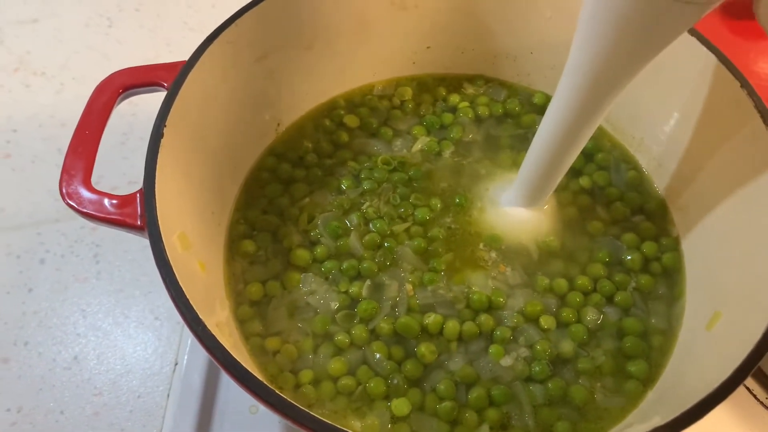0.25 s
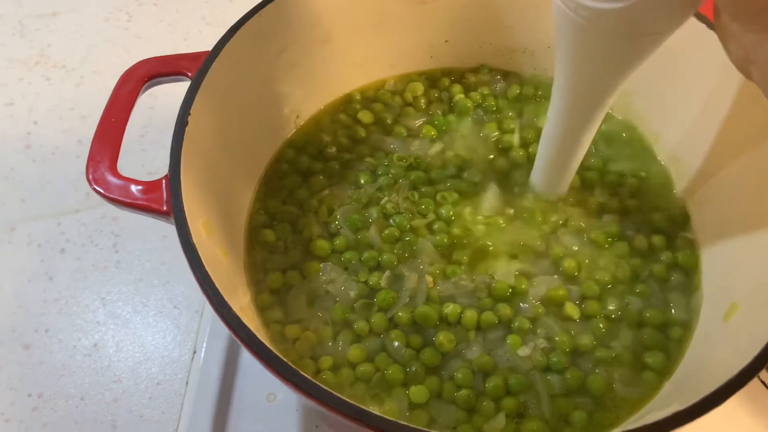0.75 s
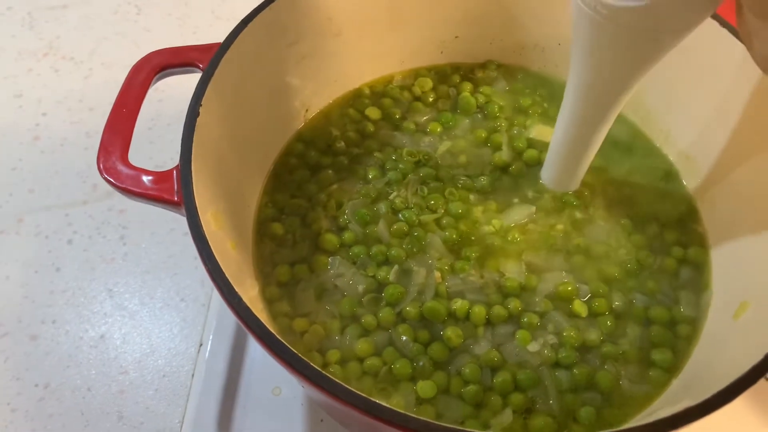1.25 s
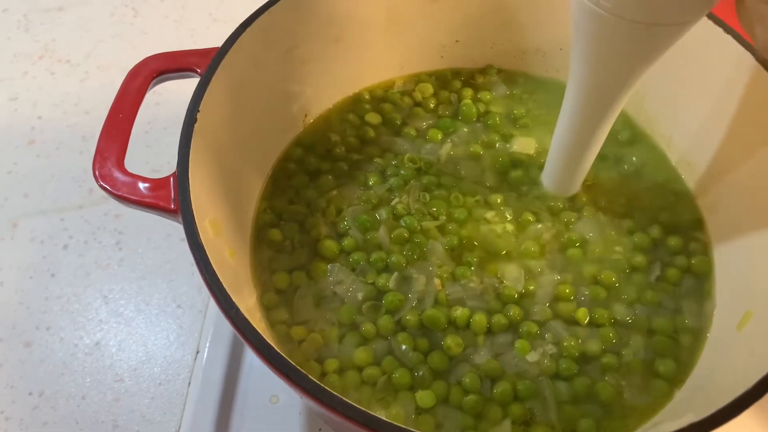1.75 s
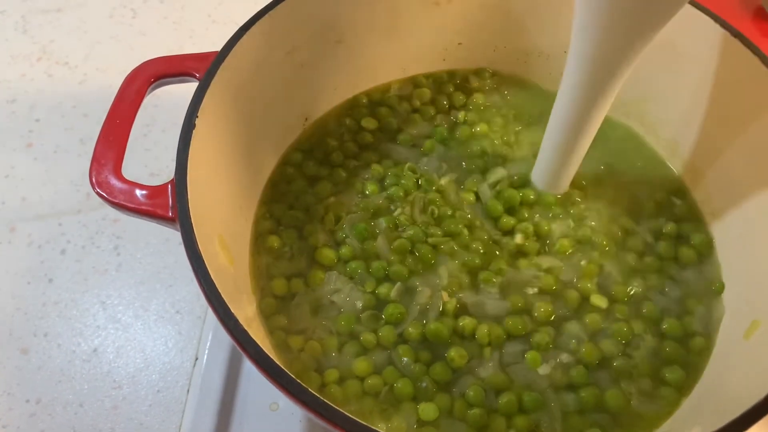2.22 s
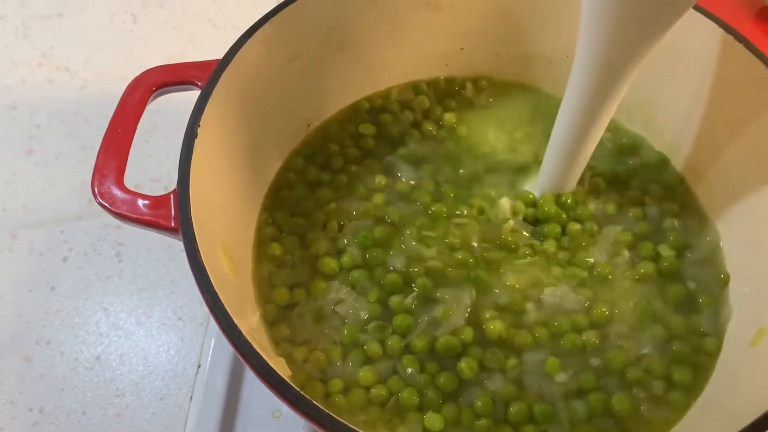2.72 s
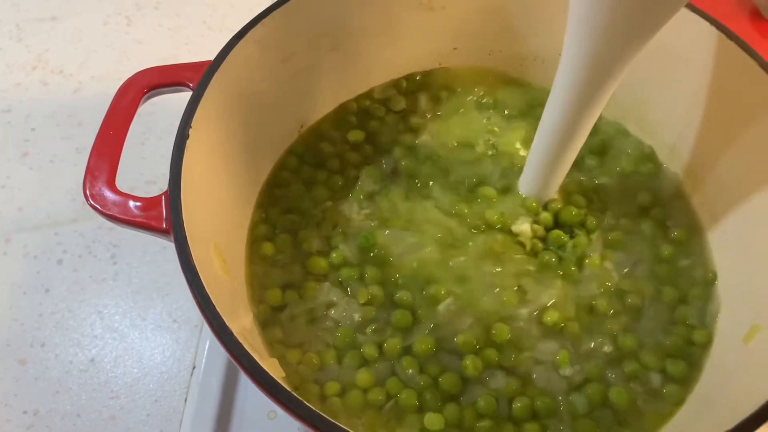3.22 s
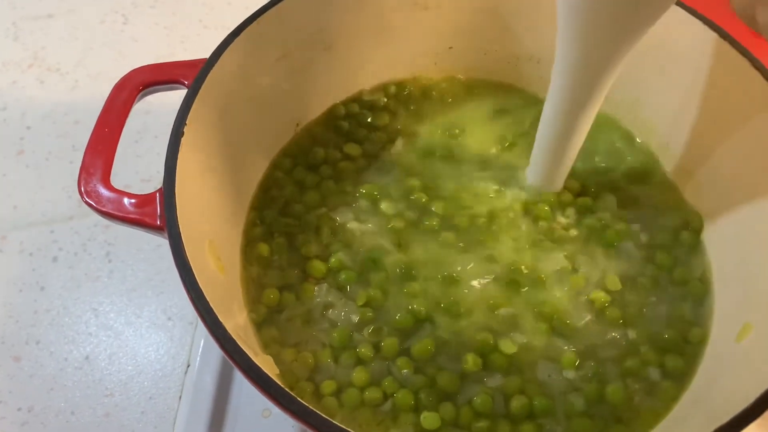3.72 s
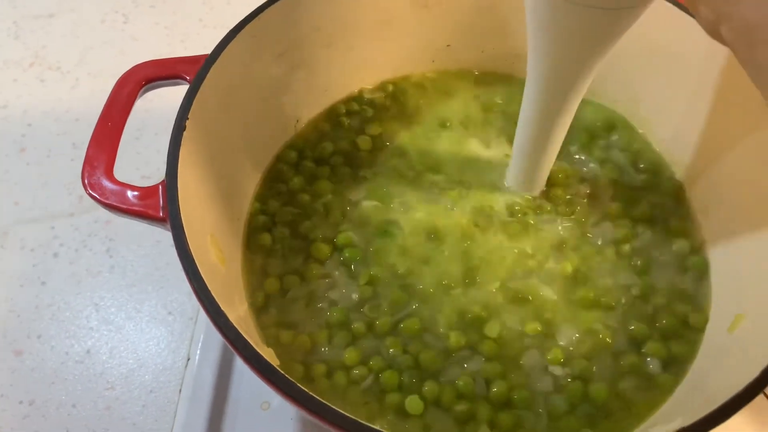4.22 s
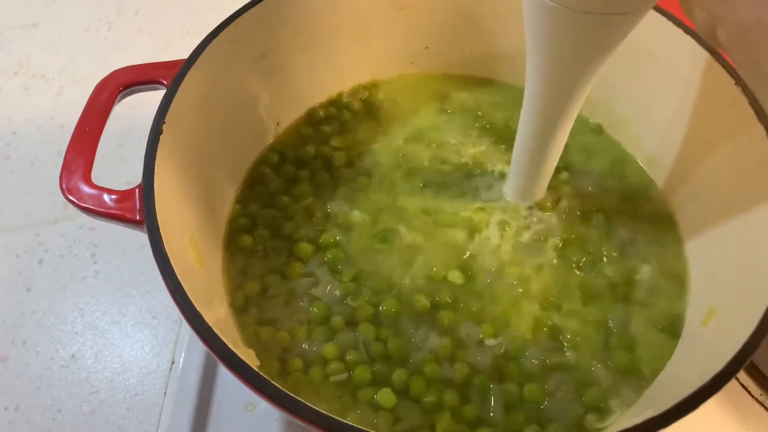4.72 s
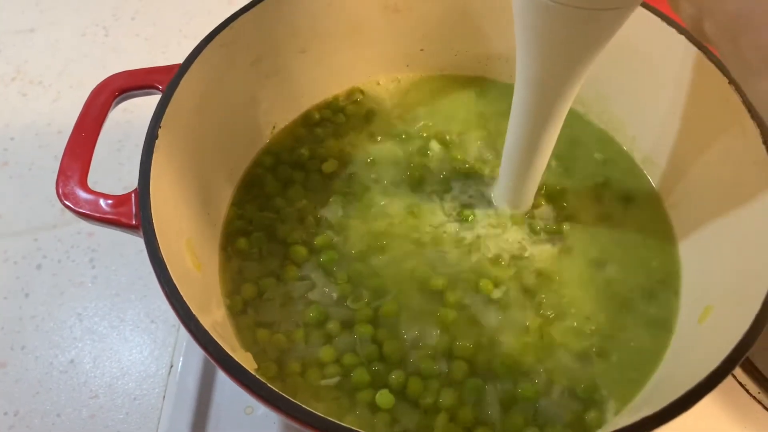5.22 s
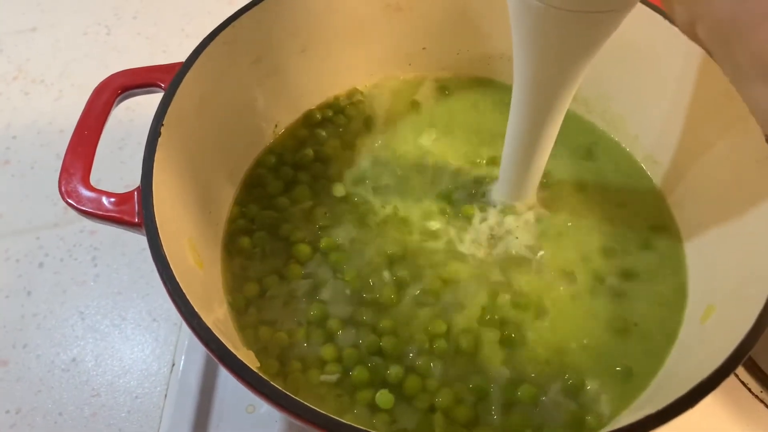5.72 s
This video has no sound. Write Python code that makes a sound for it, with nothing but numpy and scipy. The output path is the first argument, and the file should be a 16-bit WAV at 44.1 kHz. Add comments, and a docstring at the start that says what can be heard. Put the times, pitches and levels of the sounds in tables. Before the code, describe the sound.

A hand-held blender purees peas in a pot in three bursts, its whine starting, coasting down and restarting amid wet splashing and clicks.

```python
"""Faint room noise, then a switch click: a hand-held blender starts to puree pea soup in an enamelled pot.
It runs in three bursts, close to a phone in a small kitchen, with switch clicks around each start.
The motor spins up, labours and coasts down; its two-winged blade sings at even multiples of the shaft speed.
Shaped noise makes the soup swirl, splash and spray, and makes the fizz of bubbles collapsing behind the blade.
Short ringing tones make glugs and stirred bubbles; brief noise bursts make pops and the knocks of peas."""
import sys
import numpy as np
from scipy import signal
from scipy.fft import rfft, irfft, next_fast_len
from scipy.io import wavfile
from scipy.ndimage import map_coordinates

SR = 44100
rng = np.random.default_rng(int(sys.argv[2]) if len(sys.argv) > 2 else 0)


def generate_wav(sig):
    """Save sig (samples, or channels by samples) to the path in sys.argv[1] as 16-bit PCM at SR."""
    pcm = np.round(np.clip(np.atleast_2d(sig).T, -1, 1) * 32767).astype(np.int16)
    wavfile.write(sys.argv[1], SR, pcm)


N = 263012  # length [samples]

# Level columns are relative: the functions may trim or fade them further.
# background noise of the room: (time [s], level [dB])
BACKGROUND = [(0.11, -53), (0.6, -62.5)]
# its tone colour: (frequency [Hz], level [dB])
BACKGROUND_SPECTRUM = [(20, -33), (50, 6.5), (100, -8.5), (160, 0.5), (280, -0.5), (500, -11.5),
                       (1200, -20), (2300, -9), (4000, -24), (16000, -48.5)]

# switch contacts: (time [s], level [dB])
SWITCH = [(0.1247, -28), (0.128, -10.5), (1.178, -47.5), (1.206, -43), (1.216, -20.5), (3.2, -42),
          (3.218, -41)]
# plastic housing that they ring: (frequency [Hz], level [dB], time to fall 60 dB [s])
HOUSING = [(950, -12, 0.088), (1130, -3.5, 0.057), (1620, -11.5, .04), (2860, -22, 0.09), (6980, -9, 0.025),
           (7670, -11.5, 0.04)]
# lift of the clicks: (frequency [Hz], level [dB])
CLICK_LIFT = [(8000, 3.0), (15000, 3.6)]

# button held down: (on [s], off [s], time constant of the coast-down [s])
BURSTS = [(0.12, 0.605, 0.24), (1.208, 2.89, .26), (3.202, 5.766, 0.42)]
# speed that the load of peas allows, before spin-up and coasting: (time [s], shaft speed [turns/s])
LOADED_SPEED = [(0.2, 250), (0.27, 233), (0.35, 239), (0.42, 250), (0.48, 259), (0.6, 267), (1.3, 259),
                (1.42, 273), (1.52, 274), (1.62, 281), (1.84, 281), (1.97, 287.5), (2.15, 286), (2.25, 280),
                (2.88, 272.5), (3.45, 253), (3.72, 262), (3.9, 280), (4.15, 288.5), (4.42, 290),
                (4.65, 295), (4.95, 295), (5.08, 298), (5.26, 287), (5.76, 299)]
SPIN_UP_S, LET_GO_S = .043, 0.11  # time constants: the shaft gathers speed; the blade stops driving the soup
FRICTION_SHARE = .13  # dry friction brings the coasting shaft to a dead stop
WANDER_SHARE = 0.00182  # size of the random unevenness, as a share of the speed
# below this speed [turns/s] the shaft labours and turns unevenly; the angle [rad] sets how much
SHUDDER_RAD, STEADY_ABOVE_HZ = 0.22, 260

# An "order" is a tone at that many times the shaft speed.
# hum of the shaft's imbalance: (time [s], level [dB])
HUM = [(0.3, -40.5), (0.6, -38), (1.4, -40.5), (1.65, -43.5), (2.15, -39.5), (2.35, -46), (2.6, -34.5),
       (2.88, -35), (3.3, -50.5), (3.9, -43), (4.2, -40), (5.1, -39), (5.27, -35), (5.4, -39.5),
       (5.76, -38)]
# main blade tones: (time [s], order 2 level [dB], order 4 level [dB], order 6 level [dB])
BLADE_TONES = [(0.2, -29, -24, -15), (0.27, -31.5, -35, -38), (0.36, -35, -34, -46), (0.44, -27, -17, -29),
               (0.54, -18.5, -40, -24.5), (0.6, -14, -21, -22), (1.3, -24.5, -17, -13.5),
               (1.35, -28, -19.5, -31), (1.39, -19, -19, -31), (1.45, -17, -23, -30),
               (1.51, -28, -21.5, -30), (1.6, -23.5, -25, -26.5), (1.68, -23.5, -23.5, -35),
               (1.74, -23, -13.5, -27), (1.81, -24.5, -18, -33), (1.89, -24.5, -19, -31),
               (2.06, -22.5, -26, -33.5), (2.39, -16.5, -23, -39), (2.52, -16, -30.5, -43),
               (2.55, -16, -30, -34.5), (2.78, -15, -24.5, -40), (2.88, -16.5, -24, -36),
               (3.3, -35, -42, -28), (3.36, -33.5, -22, -45), (3.46, -26, -37, -23),
               (3.56, -21, -46, -40.0), (3.65, -11.5, -52, -27.5), (3.76, -12.5, -32, -31.5),
               (3.85, -19.5, -26, -30.5), (3.99, -25, -25.5, -47), (4.26, -26.5, -31.5, -50),
               (4.31, -39, -38, -44), (4.48, -43, -27, -44), (4.55, -31, -44, -49), (4.63, -26, -32, -33.5),
               (4.79, -20.5, -27.5, -37.5), (5.09, -24.5, -33.5, -39.5), (5.25, -20.5, -18.5, -43),
               (5.31, -21, -27, -41.5), (5.76, -25, -29.5, -38)]
# brief dropouts and flares of those tones: (time [s], half width [s], order 2 change [dB], order 4 change [dB])
FLICKERS = [(0.597, 0.0064, 1, 8.5), (0.64, 0.037, -6, -0.5), (1.453, 0.007, 1, 11.5),
            (1.89, 0.016, -5.5, 0.5), (2.0, 0.014, 4.5, -7), (2.025, 0.008, -11, 0), (2.06, 0.0073, -8, -1),
            (2.1, 0.011, -9, 5.5), (2.197, 0.024, -18.5, 4.5), (2.267, 0.008, -15.5, -4),
            (2.351, 0.023, -9, 3), (2.5, 0.026, -2.5, 1.5), (2.619, 0.019, -7, 3.5),
            (2.712, 0.024, -16, -4), (2.925, 0.042, -13, -8), (3.98, 0.028, -0.5, 6),
            (4.02, 0.018, -11, -4), (4.09, .012, -14, 1), (4.165, 0.014, 4.5, -3), (4.21, 0.017, -3.5, -19),
            (4.4, 0.02, 12, 3), (4.52, 0.031, -26, 5), (5.075, .03, -26, 5), (5.335, 0.014, 0.5, -9),
            (5.42, 0.025, -6.5, -1), (5.44, 0.031, -1.5, 4.5), (5.805, 0.027, 6, 11),
            (5.86, .018, 21.5, -4)]
# weak tones: (order [times shaft speed], level against the spray [dB])
WEAK_ORDERS = [(3, -11), (5, -7), (7, -14), (8, -6.5), (9, -20), (10, -12), (11, -20), (12, -16), (13, -20),
               (14, -18)]
# the weak tones come and go, and sink once the shaft runs free of its load
SWELL_DB, FREE_ABOVE_HZ, FREE_DB_PER_HZ = 2.2, 286, .35

# how each sound dies with the motor: (power of the speed that it follows, extra loss while coasting [dB])
HUM_LAW, BLADE_LAW, OCTAVE_LAW, SIXTH_LAW = (3.4, 3.6), (3.2, 25.4), (3.3, 7.5), (4, 18)
SWIRL_LAW, SPLASH_LAW, SPRAY_LAW, FIZZ_LAW = (1.3, 4), (1.57, 3.5), (1.65, 7.5), (2.8, 8)

# noises of the soup: (time [s], swirl level [dB], spray level [dB], fizz level [dB])
SOUP = [(0.19, -24, -15, -42), (0.27, -35, -21.5, -39), (0.36, -29.5, -19.5, -35),
        (0.49, -33.5, -25.5, -30.5), (0.6, -47.5, -24.5, -35.5), (1.28, -40, -23.5, -42),
        (1.37, -44, -20, -30.5), (1.46, -36, -27, -32), (1.57, -51.0, -28.5, -45.5),
        (1.74, -43.5, -31, -48.5), (2.27, -36, -35, -38), (2.88, -33.5, -34, -39), (3.28, -30, -35, -45.5),
        (3.41, -34, -33.5, -38.5), (3.58, -38.5, -32.5, -40), (3.78, -34, -32, -50.5),
        (4.03, -32.5, -39, -52.5), (5.13, -32.5, -39.5, -49), (5.22, -31, -36.5, -44.5),
        (5.31, -33.5, -40, -49), (5.76, -30.5, -36, -52.5)]
# splash level at one spray level, before trim and fades; dB gained per dB of spray
SPLASH_DB, SPLASH_AT_SPRAY_DB, SPLASH_GROWS = -35, -33.5, 0.5
# tone colour of the low swirl: (frequency [Hz], level [dB])
SWIRL_SPECTRUM = [(120, -34), (170, -7), (225, -22), (275, 0), (345, -6.5), (440, 3.5), (520, 2.5),
                  (650, -3.5), (1000, -12.5), (3000, -74.5)]
# tone colour of the splashes: (frequency [Hz], level [dB])
SPLASH_SPECTRUM = [(250, -37), (500, -16), (680, -2), (780, -7), (900, -2), (1110, 8.5), (1260, 3),
                   (1400, 3.5), (1650, -2.5), (2100, -22), (4000, -51)]
# tone colour of the fine spray: (frequency [Hz], level [dB])
SPRAY_SPECTRUM = [(500, -35), (1000, -2), (1600, 3.5), (2100, 3), (2700, -2), (3600, -2), (4300, -7.5),
                  (5000, -11), (6500, -8.5), (8000, -9.5), (9500, -16), (12000, -22), (16000, -28)]
# tone colour of the thrust that shoves the pot: (frequency [Hz], level [dB])
THRUST_SPECTRUM = [(18, -43.5), (38, -6), (56, 1.5), (80, -7), (115, -12), (153, 0.5), (185, 5),
                   (220, -11.5), (300, 1), (420, -11)]
# tone colour of the collapsing bubbles: (frequency [Hz], level [dB])
FIZZ_SPECTRUM = [(2000, -15), (5000, -5), (7000, 0), (8300, -3), (9500, -1.5), (10700, 1), (11800, -4),
                 (13500, -6.5), (15500, -9)]
# stirred bubbles: how many a second, middle pitch, cycles until nearly gone, level over the splash
BUBBLES_PER_S, BUBBLE_HZ, BUBBLE_CYCLES, BUBBLE_DB = 110, 989, 9.9, -4

# peas caught by the blade knock on its guard: (time [s], level [dB])
KNOCKS = [(0.185, -2.5), (0.197, -5), (0.209, -5), (0.248, -6.5), (0.491, -2.5), (1.263, -6), (1.277, -6),
          (1.299, -3.5), (1.32, -8.5), (1.342, -10), (1.364, -7), (1.405, -12), (1.446, -14), (1.464, -11),
          (1.504, -12)]
# tone colour of the knocks: (frequency [Hz], level [dB])
KNOCK_SPECTRUM = [(120, -40), (400, -22), (750, -4), (1150, 3), (1600, -1), (2200, -7),
                  (5000, -48), (12000, -50)]
# big air pockets closing: (time [s], frequency [Hz], level [dB], time to fall 60 dB [s])
GLUGS = [(0.189, 315, -15, 0.096), (0.891, 273, -44, 0.23), (1.298, 320, -31, 0.08)]
# froth fizzes on after the first stop: it holds, then fades
FROTH_DB, FROTH_HOLD_S, FROTH_FADE_DB_PER_S = -50.5, 0.33, 128.5
# tone colour of the froth: (frequency [Hz], level [dB])
FROTH_SPECTRUM = [(3000, -12), (7000, 4), (11000, -12), (15500, -21)]
# single loud bubble bursts: (time [s], level [dB])
POPS = [(5.204, -29), (5.224, -17), (5.227, -13), (5.252, -14), (5.268, -20), (5.405, -15)]
# tone colour of the pops: (frequency [Hz], level [dB])
POP_SPECTRUM = [(4000, -31), (10000, 5.5), (15000, -13)]

# ringing of the filled pot: (frequency [Hz], width [Hz], level [dB])
POT_MODES = [(151.4, 8.1, 3.5), (430.4, 12.4, -2.5), (661, 5.2, 5.5), (782, 11, -2), (1132, 11, -1)]
# echo tail of the kitchen: (frequency [Hz], time to fall 60 dB [s])
KITCHEN = [(150, 0.76), (1000, 0.42), (4000, 0.1), (14000, 0.12)]
# the two microphone ports: (frequency [Hz], phase by which the left leads [rad])
PORT_PHASE = [(0, 0), (290, -.4), (540, -1.05), (700, -1.1), (900, -.25), (1400, 0), (2400, 1.2),
              (3400, 1.45), (4700, 3.14), (15400, 18.9)]
# their loudness: (frequency [Hz], left minus right [dB])
PORT_BALANCE = [(60, -1), (170, -1.5), (300, -1.5), (560, 0), (750, -9), (1200, -2.5), (2200, -3.2),
                (4000, 0)]
TOP_HZ = 15950  # nothing is kept above this


def amp(db):
    """Turn decibels into gain."""
    return 10 ** (np.asarray(db) / 20)


def unit(x):
    """Scale to an rms (average strength) of 1."""
    return x / np.sqrt(np.mean(x ** 2) + 1e-20)


def along(points, hz):
    """Read (frequency, value) points on a log frequency axis."""
    f, v = np.transpose(points)
    return np.interp(np.log(hz + 1), np.log(f + 1), v)


def curves(rows):
    """Give one value per sample for each column after the time."""
    s, *cols = np.transpose(rows)
    return [np.interp(np.arange(N) / SR, s, c) for c in cols]


def running(rows):
    """Like curves, but every burst keeps its own rows until the next one starts."""
    rows = np.array(rows)
    restarts = [on for on, _, _ in BURSTS[1:]]
    owner = np.searchsorted(restarts, rows[:, 0])
    burst_now = np.searchsorted(restarts, np.arange(N) / SR)
    return np.choose(burst_now, [curves(rows[owner == k]) for k in range(len(BURSTS))])


def wobble(rate):
    """Draw a smooth random curve with this many knots a second."""
    knots = rng.standard_normal(int(N * rate / SR) + 4)
    return map_coordinates(knots, [np.arange(N) * rate / SR])


def filtered(x, response):
    """Multiply the spectrum of x by a response, which may be complex."""
    m = next_fast_len(N + SR // 2)
    return irfft(rfft(x, m) * response(np.fft.rfftfreq(m, 1 / SR)), m)[..., :N]


def churned(spectrum, drive, spread):
    """Stereo noise sized by drive, then coloured, at rms 1; spread is the part unlike at the two ports."""
    noise = rng.standard_normal(N) + spread * rng.standard_normal((2, N))
    return unit(filtered(noise * drive, lambda hz: amp(along(spectrum, hz))))


def grains(rate, life, scatter_db):
    """Envelope of rms 1 of random bursts, rate a second, each dying within about life seconds."""
    scatter = np.clip(rng.standard_normal(N), -2, 2)
    sizes = (rng.random(N) < rate / SR) * amp(scatter_db * scatter)
    power = signal.lfilter([1], [1, -np.exp(-2 / (life * SR))], sizes ** 2)
    return unit(np.sqrt(np.abs(power)))


def background():
    """The room's faint noise: steady random sound with a fixed tone colour and a slowly set level."""
    return amp(curves(BACKGROUND)[0]) * churned(BACKGROUND_SPECTRUM, 1, spread=.1)


def switch():
    """Each contact cracks and briefly rings the plastic housing."""
    out = np.zeros(N + SR)
    t = np.arange(SR // 8) / SR
    for s, db in SWITCH:
        ring = np.zeros(len(t))
        for hz, level, t60 in HOUSING:
            mode_db = level + rng.normal(0, 2.5)
            ring += amp(mode_db - 60 * t / t60) * np.sin(2 * np.pi * hz * t)
        crack = .5 * amp(-60 * t / 0.073) * rng.standard_normal(len(t))
        out[round(s * SR):][:len(t)] += amp(db - 5.5) * (ring + crack)
    return filtered(out[:N], lambda hz: amp(along(CLICK_LIFT, hz)))


def throttle():
    """The shaft's share of running speed, and how far the blade is coasting, both 0-1."""
    t = np.arange(N) / SR
    stops = [on for on, _, _ in BURSTS[1:]] + [np.inf]
    spin, drive = np.zeros(N), np.zeros(N)
    for (on, off, coast), stop in zip(BURSTS, stops):
        since_off = np.maximum(t - off, 0)
        spin_up = 1 - np.exp(-np.maximum(t - on, 0) / SPIN_UP_S)
        run_down = np.maximum(np.exp(-since_off / coast) - FRICTION_SHARE, 0) / (1 - FRICTION_SHARE)
        spin += spin_up * run_down * (t < stop)
        drive += (t >= on) * np.exp(-since_off / LET_GO_S)
    return spin, 1 - drive


def fade_db(state, law):
    """A sound grows as a power of the speed and drops further when the blade coasts."""
    (spin, coasting), (power, coast_db) = state, law
    return power * 20 * np.log10(np.maximum(spin, 1e-4)) - coast_db * coasting


def levels(state):
    """Set the swirl, splash, spray and fizz [dB]; splash follows spray, the others also waver at random."""
    swirl_db, spray_db, fizz_db = running(SOUP)
    splash_db = SPLASH_DB + SPLASH_GROWS * (spray_db - SPLASH_AT_SPRAY_DB)
    swirl_db = swirl_db + fade_db(state, SWIRL_LAW) + 2.47 * wobble(14)
    splash_db = splash_db + fade_db(state, SPLASH_LAW)
    spray_db = spray_db + fade_db(state, SPRAY_LAW) + 0.73 * wobble(9.6)
    fizz_db = fizz_db + fade_db(state, FIZZ_LAW) + 2.0 * wobble(21.96)
    return swirl_db, splash_db, spray_db, fizz_db


def partial(angle, order, flutter, slip):
    """One shaft order of rms 1; passing peas shake its strength and phase."""
    shake = 1 + flutter * wobble(45)
    phase = order * angle + slip * wobble(70) + rng.uniform(0, 2 * np.pi)
    return unit(shake * np.sin(phase))


def motor(angle, speed, state, spray_db):
    """Shaft imbalance hums at order 1; the two blade wings sing at the even orders."""
    spin, _ = state
    t = np.arange(N) / SR
    labour = np.sqrt(np.maximum(1 - speed / STEADY_ABOVE_HZ, 0))
    angle = angle + SHUDDER_RAD * labour * wobble(90)
    flicker_db, octave_flicker_db = sum(
        np.outer(changes, np.exp(-((t - s) / width) ** 2)) for s, width, *changes in FLICKERS)

    blade_db, octave_db, sixth_db = running(BLADE_TONES)
    hum_db = running(HUM)[0] + fade_db(state, HUM_LAW) + 0.81 * wobble(14)
    blade_db = blade_db + fade_db(state, BLADE_LAW) + flicker_db + 0.77 * wobble(23.9)
    octave_db = octave_db + fade_db(state, OCTAVE_LAW) + octave_flicker_db + 0.72 * wobble(24)
    sixth_db = sixth_db + fade_db(state, SIXTH_LAW) + 1.8 * wobble(24.22)
    tone = amp(hum_db) * partial(angle, order=1, flutter=0.32, slip=0.066)
    tone += amp(blade_db - .5) * partial(angle, order=2, flutter=.17, slip=.13)
    tone += amp(octave_db - .5) * partial(angle, order=4, flutter=.26, slip=.22)
    tone += amp(sixth_db - 1) * partial(angle, order=6, flutter=.24, slip=.2)

    free_db = FREE_DB_PER_HZ * np.maximum(speed - FREE_ABOVE_HZ, 0)
    weak = np.zeros(N)
    for order, db in WEAK_ORDERS:
        gain = amp(db - free_db + SWELL_DB * wobble(9))
        weak += gain * partial(angle, order=round(order), flutter=.45, slip=.4)
    # the weak orders fade quickly as the shaft slows
    return tone + amp(spray_db - .5) * spin ** 2 * weak


def pot(x, wall_db):
    """The enamelled wall sends back ten early echoes, which make the sound slightly hollow."""
    taps = np.zeros(round(.02 * SR))
    delays = rng.uniform(.0015, .018, size=10)
    taps[np.round(delays * SR).astype(int)] = amp(wall_db) * rng.choice([-1, 1], size=10)
    taps[0] = 1  # direct sound
    return signal.fftconvolve(x, taps[None] / np.linalg.norm(taps), axes=1)[:, :N]


def soup(angle, swirl_db, splash_db, spray_db):
    """Low swirl and thrust, with gulping splashes and fine spray chopped by each passing wing."""
    chop = 1 + 0.39 * np.cos(2 * angle) + 0.1 * np.cos(angle)
    gulps = grains(rate=1200, life=0.0093, scatter_db=4.5)
    swirl = amp(swirl_db - 1.0) * churned(SWIRL_SPECTRUM, 1, spread=0.12)
    splash = amp(splash_db + 4.0) * churned(SPLASH_SPECTRUM, gulps * chop, spread=0.4)
    droplets = churned(SPRAY_SPECTRUM, gulps * chop, spread=.3)
    spray = amp(spray_db + 0.86) * pot(droplets, wall_db=-32.5)
    # the harder the blade throws the soup, the more it shoves the pot
    thrust = amp(.5 * spray_db - 26.0) * churned(THRUST_SPECTRUM, 1, spread=0.045)
    return swirl + splash + spray + thrust


def bubbles(splash_db):
    """Air stirred under rings as short blips that rise in pitch; more splashing makes them louder."""
    count = round(BUBBLES_PER_S * N / SR)
    start, pitch, size = rng.random((count, 3)).T[:, :, None]
    age = np.arange(SR // 25)  # [samples]
    cycles = BUBBLE_HZ * 2 ** (2 * pitch - 1) * age / SR  # an octave either way
    life = cycles / BUBBLE_CYCLES
    envelope = amp(12 * size) * (1 - np.exp(-cycles)) * np.exp(-2 * life)
    blips = envelope * np.sin(2 * np.pi * cycles * (1 + .06 * life))
    places = (start * N).astype(int) + age
    out = np.bincount(places.ravel(), blips.ravel(), N)[:N]
    return amp(splash_db + BUBBLE_DB) * unit(out)


def cavitation(angle, fizz_db):
    """Tiny bubbles collapse in the wake of each wing, as a fine crackling fizz."""
    wake = 1 + 0.38 * np.cos(2 * angle) + 0.17 * np.cos(angle)
    crackle = grains(rate=3000 * wake, life=0.00032, scatter_db=3.0)
    return amp(fizz_db + 5.5) * churned(FIZZ_SPECTRUM, crackle, spread=.25)


def knocks():
    """Each caught pea gives a short dull clack among the splashes."""
    t = np.arange(N) / SR
    blows = np.zeros(N)
    for s, db in KNOCKS:
        age = np.maximum(t - s, 0)
        blows += amp(db - 60 * age / .04) * (1 - np.exp(-age / .001))
    return .56 * blows * churned(KNOCK_SPECTRUM, 1, spread=.3)


def glugs():
    """Each big air pocket swells softly and rings out low."""
    t = np.arange(N) / SR
    out = np.zeros(N)
    for s, hz, db, t60 in GLUGS:
        age = np.maximum(t - s, 0)
        envelope = amp(db - 60 * age / t60) * (1 - np.exp(-age / 0.0091))
        out += envelope * np.sin(2 * np.pi * hz * age)
    return out


def froth():
    """Whipped-up foam hisses on for a moment after the first burst, as many tiny noise bursts."""
    _, first_stop, _ = BURSTS[0]
    since = np.arange(N) / SR - first_stop
    fade = FROTH_FADE_DB_PER_S * np.maximum(since - FROTH_HOLD_S, 0)
    envelope = (since >= 0) * amp(FROTH_DB - fade)
    specks = grains(rate=900, life=0.002, scatter_db=-0.5)
    return envelope * churned(FROTH_SPECTRUM, specks, spread=0.086)


def pops():
    """Larger bubbles snap one by one, each a bright noise burst that dies at once."""
    t = np.arange(N) / SR
    bursts = sum(amp(db - 60 * np.abs(t - s) / 0.013) * (t >= s) for s, db in POPS)
    noise = 0.38 * bursts * rng.standard_normal(N)
    return filtered(noise, lambda hz: amp(along(POP_SPECTRUM, hz)))


def pot_ring(x):
    """The few lasting modes of the filled pot answer whatever strikes it."""
    def response(f):
        return sum(amp(db) * 1j * f * width / (hz ** 2 - f ** 2 + 1j * f * width)
                   for hz, width, db in POT_MODES)
    return filtered(x, response)


def kitchen(x, spread):
    """Tiles and cupboards answer with a short tail, nearly alike at the two close ports."""
    noise = rng.standard_normal((3, SR * 3 // 4))
    hz, t, z = signal.stft(noise[0] + spread * noise[1:], SR, nperseg=256)
    decay = amp(-60 * t / along(KITCHEN, hz)[:, None])
    tail = signal.istft(z * decay, SR, nperseg=256)[1]
    delay = round(.004 * SR)
    tail = np.pad(tail / np.linalg.norm(tail[0]), ((0, 0), (delay, 0)))
    return signal.fftconvolve(x, tail, axes=1)[:, :N]


def ports(x):
    """The pot is off to one side: each port hears it with its own phase and shading."""
    def response(hz):
        lead = np.interp(hz, *np.transpose(PORT_PHASE))
        side = np.array([[.5], [-.5]])  # left, right
        return amp(side * along(PORT_BALANCE, hz)) * np.exp(1j * side * lead)
    return filtered(x, response)


def scene():
    """One shaft angle drives the whine, the chopping of the soup and the fizz."""
    state = throttle()
    spin, _ = state
    speed = running(LOADED_SPEED)[0] * spin * (1 + WANDER_SHARE * wobble(20))
    angle = 2 * np.pi * np.cumsum(speed) / SR
    swirl_db, splash_db, spray_db, fizz_db = levels(state)

    whine = motor(angle, speed, state, spray_db)
    fizz = pot(cavitation(angle, fizz_db), wall_db=-15.0) + froth()
    splatter = soup(angle, swirl_db, splash_db, spray_db) + bubbles(splash_db) + fizz
    splatter = splatter + switch() + knocks() + glugs() + pops()
    splatter = splatter + pot_ring(splatter)
    room = kitchen(amp(-13) * splatter + amp(-19.5) * whine, spread=0.25)
    return ports(whine + splatter + room + background())


def record(dry):
    """The phone rounds the highest peaks and keeps nothing above its band limit."""
    limited = dry / (1 + np.abs(dry) ** 8) ** (1 / 8)
    return filtered(limited, lambda hz: np.clip((TOP_HZ - hz) / 250, 0, 1))


dry = scene()
out = record(dry)
generate_wav(out)
```